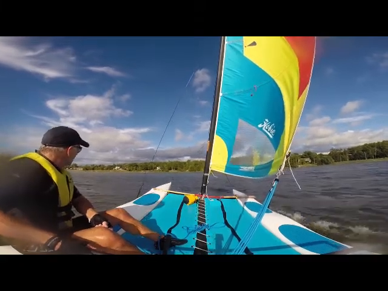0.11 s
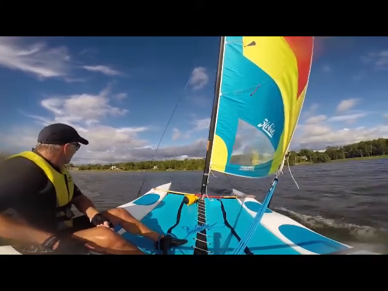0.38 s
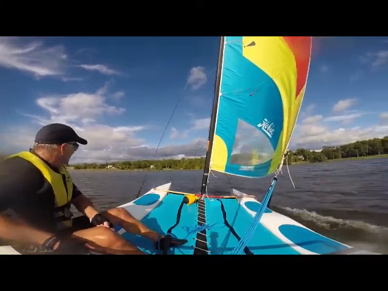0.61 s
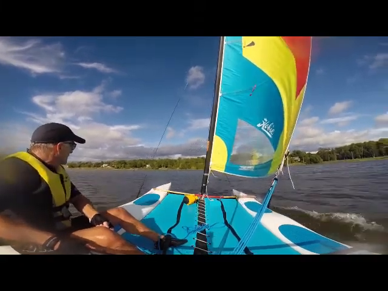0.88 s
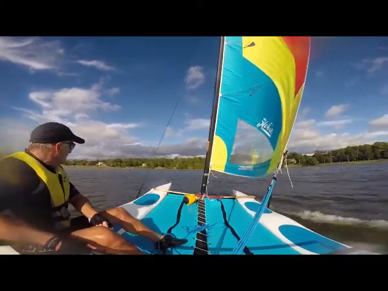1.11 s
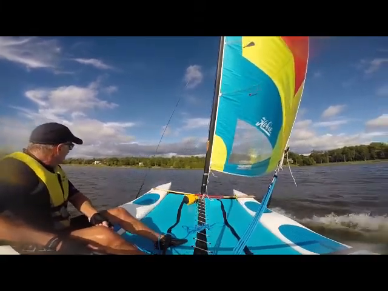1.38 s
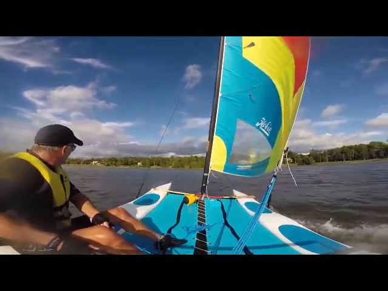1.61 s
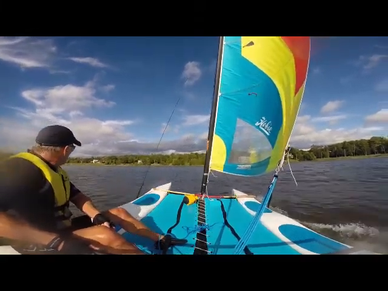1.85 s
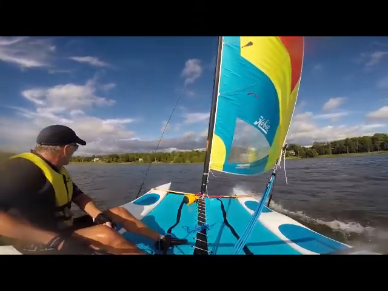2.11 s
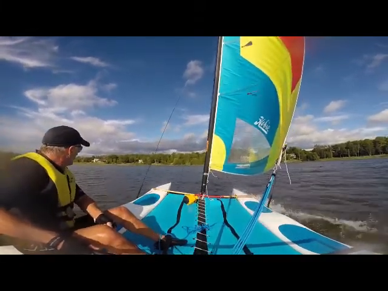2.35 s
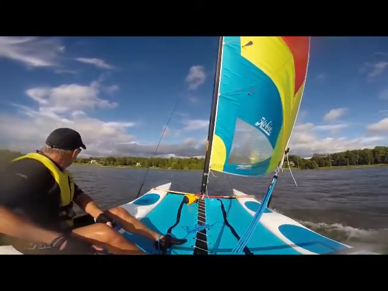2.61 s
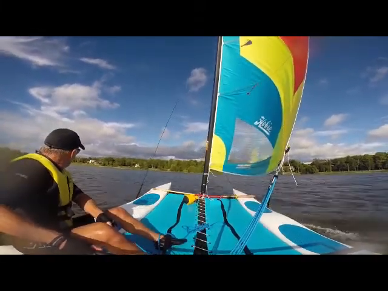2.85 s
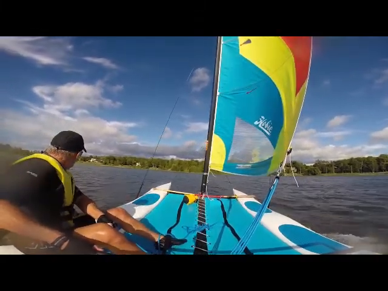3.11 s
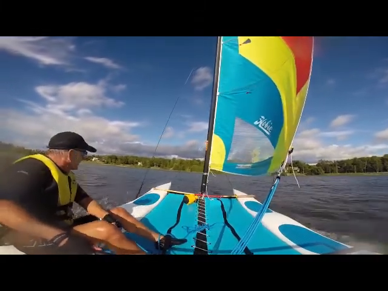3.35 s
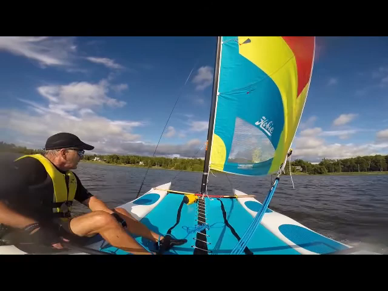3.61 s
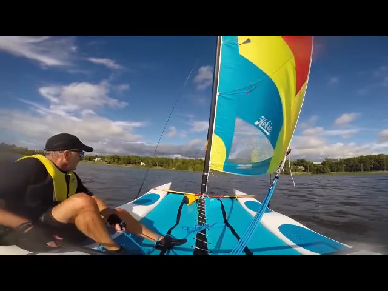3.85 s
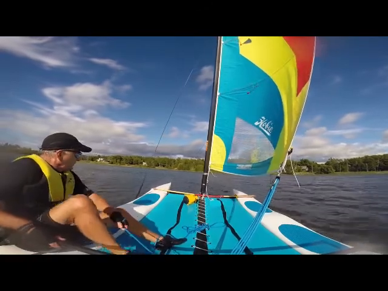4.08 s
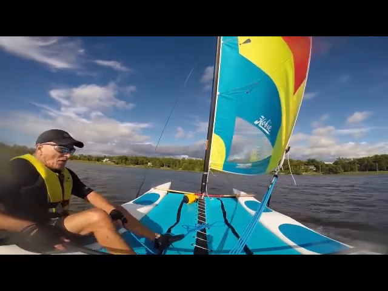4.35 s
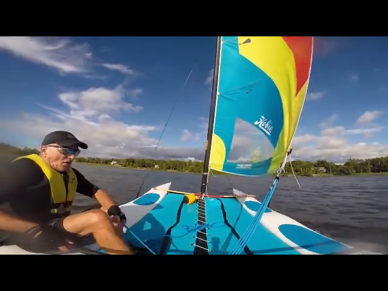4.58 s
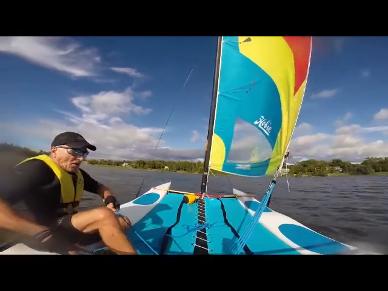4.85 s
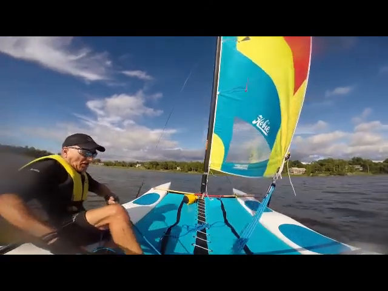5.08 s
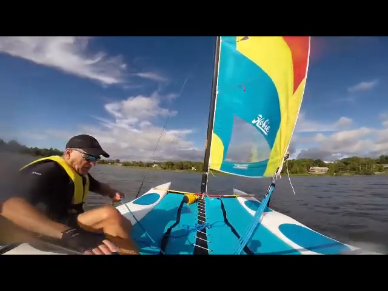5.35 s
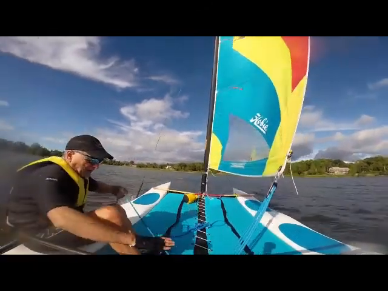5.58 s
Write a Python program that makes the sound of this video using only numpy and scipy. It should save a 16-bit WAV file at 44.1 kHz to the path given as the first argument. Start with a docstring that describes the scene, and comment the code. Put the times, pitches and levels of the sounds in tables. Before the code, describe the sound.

Low muffled rumble and thin spray hiss on a moving sailing catamaran, wavering rudder hum, then a flurry of hollow hull knocks and splashy thumps.

```python
"""A low rumble, hissing spray and a faint rudder hum sound from the start, heard by a small camera in a sealed
housing on a sailing catamaran. Water shakes the frame and boat (noise through resonances), spray hisses through
the housing, the rudders hum as wavering tones and the electronics whine faintly. Waves and a moving sailor knock
the hull: short rough pushes that ring its resonances. Short clicks, most of them from fittings, are brief rings
with cracks; drops drip on rising notes. The level dips briefly after 2.0 s and drops suddenly at 3.7 s."""
import sys
import numpy as np
from scipy import signal
from scipy.fft import rfft, irfft, next_fast_len
from scipy.io import wavfile
from scipy.ndimage import uniform_filter1d, map_coordinates

SR = 44100
rng = np.random.default_rng(int(sys.argv[2]) if len(sys.argv) > 2 else 0)


def magnitude_from_level(level_db):
    """Linear magnitude for a level in decibels (20 dB per decade)."""
    exponent = np.asarray(level_db, float) / 20
    return 10 ** exponent


def pcm_store(signal):
    """Save signal as 16-bit PCM."""
    levels = np.round(np.clip(np.atleast_2d(signal), -1, 1) * 32767)
    wavfile.write(sys.argv[1], SR, levels.astype(np.int16).T)


N = 251811  # length in samples


def unit(x):
    """Scaled to rms 1."""
    return x / np.sqrt(np.mean(x ** 2) + 1e-20)


def curves(rows):
    """One value per sample for each column after the time, by straight lines between rows."""
    start_s, *columns = np.transpose(rows)
    return [np.interp(np.arange(N) / SR, start_s, column) for column in columns]


def wobble(rate):
    """A smooth random curve through rate random points a second."""
    points = rng.standard_normal(int(N * rate / SR) + 4)
    return map_coordinates(points, [np.arange(N) * rate / SR])


def filtered(x, response):
    """x shaped by a response: a function of frequency in Hz."""
    size = next_fast_len(N + SR // 2)  # room for the ringing to die away
    return irfft(rfft(x, size) * response(np.fft.rfftfreq(size, 1 / SR)), size)[:N]


def modes(table):
    """Response of a set of resonances, each ringing on after it is pushed; neighbours have opposite sign."""
    def response(f):
        total = 0
        for k, (centre, width, db) in enumerate(table):
            peak = 1j * f * width / (centre * centre - f * f + 1j * f * width)
            total = total + (-1) ** k * magnitude_from_level(db) * peak
        return total
    return response


def steep(table, top_hz):
    """Resonances whose treble falls away fast above top_hz."""
    return lambda f: modes(table)(f) / (1 + 1j * f / top_hz) ** 2


# resonances of the hull's skin: pitch_hz, width_hz, level_db
SKIN_MODES = [(365.4, 33.3, 4), (458.8, 61.7, 2), (564.7, 49.5, -3.5), (742.5, 43, -15)]


def shell(f):
    """The hull's stiff skin rings in its modes and hardly moves below them."""
    return modes(SKIN_MODES)(f) * (1j * f / 320 / (1 + 1j * f / 320)) ** 3


def waver(turn, rate, steady):
    """A tone of phase turn (radians), partly steady and partly scattered rate times a second."""
    return unit((steady + wobble(rate)) * np.cos(turn) + wobble(rate) * np.sin(turn))


def patchy(depth_db, size):
    """Noise whose gain varies in patches of time and frequency."""
    noise = signal.stft(rng.standard_normal(N + 512), nperseg=256)[2]
    field = uniform_filter1d(rng.standard_normal(noise.shape), size, 0)
    field = uniform_filter1d(field, 3 * size, 1)
    return unit(signal.istft(noise * magnitude_from_level(depth_db * unit(field)), nperseg=256)[1][:N])


def drops(per_s, spread_db):
    """Scattered small impacts of uneven size."""
    hit = rng.random(N) < per_s / SR
    return unit(hit * rng.standard_normal(N) * magnitude_from_level(spread_db * rng.standard_normal(N)))


# steady tones of the camera electronics: pitch_hz, peak_db
WHINE_TONES = [(8780, -76), (11719, -80.5)]


def whine():
    """Camera electronics sing thin, steady, high sine tones."""
    t = np.arange(N) / SR
    return sum(magnitude_from_level(db) * np.sin(2 * np.pi * hz * t) for hz, db in WHINE_TONES)


# levels heard from the water sounds: start_s, sway_db (the frame), churn_db (over calm running), spray_db;
# the spray dips briefly just after 2.0 s, and all three drop suddenly at 3.7 s
HEARD_LEVELS = [(0.0, -19.5, 0.5, -45), (0.43, -27.5, 0.5, -44), (1.0, -22.5, 1.5, -46.5),
                (1.5, -25.5, 1, -45.5), (1.985, -21.5, 4, -45.5), (2.02, -12.5, 4, -49.5),
                (2.14, -20, -1, -48), (2.3, -22.5, -1.5, -45.5), (2.75, -25, 5.5, -44),
                (3.16, -23.5, 6, -44), (3.4, -25.5, 5.5, -47.5), (3.58, -28, 9, -47),
                (3.68, -10.5, 20.5, -39.5), (3.72, -20.5, 7, -44.5), (3.98, -18, 2, -44),
                (4.04, -10, 10, -40.5), (4.17, -10, 17, -39.5), (4.21, -13, 13, -42.5),
                (4.28, -17, 16.5, -41.5), (4.4, -17.5, 3.5, -43.5), (4.52, -26, -0.5, -45),
                (5.595, -31.5, 1, -42.5), (5.625, -18, 9, -41), (5.71, -17.5, -3, -45)]
# resonances, each with pitch_hz, width_hz, level_db: the swaying frame, boom, thud, bright clack, camera housing
SWAY_MODES = [(23.6, 9.9, -2), (49.2, 5.2, 0), (75.1, 12.6, -6.5)]
BOOM_MODES = [(115.4, 15.9, 3.3), (143.5, 27.4, 1.44)]
THUD_MODES = [(209, 26.5, 5), (283, 82, -4.5)]
CLACK_MODES = [(950, 98, 4.5), (1178, 148, 3), (1704, 114, 4), (2525, 270, -8.5), (3450, 220, -7)]
HOUSING_MODES = [(1910, 140, 1.2), (2680, 224, 3.4), (3480, 80, 1.1), (4580, 170, 4.1), (6040, 470, 1.3)]
# tone colour of the spray before the housing: pitch_hz, level_db (relative, per Hz)
SPRAY_COLOUR = [(380, -19), (650, 2), (1400, -4.5), (2640, -7), (3140, -9.5), (3500, -7.5), (4990, -15.5),
                (6060, -11.5), (8120, -19.5), (10900, -21.5), (12000, -32), (15600, -71), (22000, -120)]
# boom, slosh, wash: level in calm running (dB)
CALM_LEVELS_DB = [-40, -43, -57.5]
# boom, slosh, wash: growth for each dB of churn (dB)
CHURN_GROWTH = [1, 1.11, 1.09]
# sway, boom, slosh, wash, spray: size of the random swells (dB)
SWELL_DB = [1.37, 0.93, 0.69, 2.4, 0.47]


def water():
    """Turbulence drives each part of the boat; spray reaches the microphone through the housing."""
    sway_db, churn_db, spray_db = curves(HEARD_LEVELS)
    boom_db, slosh_db, wash_db = (calm + grows * churn_db for calm, grows in zip(CALM_LEVELS_DB, CHURN_GROWTH))
    swells = [magnitude_from_level(db * wobble(6)) for db in SWELL_DB]

    # the frame keeps swinging in its main mode
    swing = waver(2 * np.pi * SWAY_MODES[1][0] * np.arange(N) / SR, rate=6.9, steady=2.55)
    shaking = unit(filtered(rng.standard_normal(N), steep(SWAY_MODES, 160)))
    sway = unit(shaking + 0.59 * swing)

    boom = unit(filtered(rng.standard_normal(N), steep(BOOM_MODES, 320))) * magnitude_from_level(1.06 * wobble(12))

    gurgle = magnitude_from_level(2.13 * wobble(25))  # slosh and wash surge together
    slaps = patchy(2.5, size=2) * gurgle + 0.5 * drops(per_s=150, spread_db=3)
    slosh = unit(filtered(slaps, lambda f: shell(f) + 0.44 * modes(THUD_MODES)(f)))

    splashes = patchy(2.5, size=2) * gurgle + 0.56 * drops(per_s=400, spread_db=3)
    broad = modes([(800, 500, 0)])
    wash = unit(filtered(splashes, lambda f: steep(CLACK_MODES, 2200)(f) + 0.2 * broad(f)))

    colour_hz, colour_db = np.transpose(SPRAY_COLOUR)

    def through_housing(f):
        colour = magnitude_from_level(np.interp(np.log(f + 1), np.log(colour_hz), colour_db))
        return colour * (0.68 + 0.61 * abs(modes(HOUSING_MODES)(f)))

    fizz = 0.4 * drops(per_s=900, spread_db=3)
    hiss = patchy(1.07, size=5) * magnitude_from_level(1.34 * wobble(26))
    spray = unit(filtered(hiss + fizz, through_housing))

    levels_db = sway_db, boom_db, slosh_db, wash_db, spray_db
    parts = sway, boom, slosh, wash, spray
    return sum(magnitude_from_level(db) * swell * part for db, swell, part in zip(levels_db, swells, parts))


# the two rudders: start_s, pitch_hz (lower tone), low_db (lower tone), high_db (higher tone)
RUDDER_TONES = [(0, 207, -33.5, -41), (.4, 199.4, -37.5, -57), (.65, 201, -34.5, -50),
                (1.0, 203.4, -32, -38.5), (1.12, 202.8, -25, -35), (1.45, 205.6, -23.5, -34),
                (1.8, 213.7, -25, -36), (2.0, 210.3, -40, -39), (2.26, 216.3, -39, -41),
                (2.52, 215.7, -25, -29.5), (2.7, 213.6, -39, -35), (3, 210, -38.5, -38.5),
                (3.2, 209.1, -26, -31.5), (3.5, 206.5, -35, -38), (4.25, 196.7, -29, -42),
                (4.52, 192.5, -35, -37.5), (4.72, 185.7, -25.5, -50), (4.94, 183.3, -44, -56),
                (5.71, 185.2, -49, -54)]


def rudder():
    """Vortices off each blade sing a wavering tone with a weak octave; the two beat."""
    low_hz, low_db, high_db = curves(RUDDER_TONES)
    turn = 2 * np.pi * np.cumsum(low_hz) / SR

    def sing(phase):
        octave = waver(2 * phase, rate=30, steady=0.22)
        return waver(phase, rate=19, steady=0.88) + magnitude_from_level(-21.5) * octave

    return magnitude_from_level(low_db) * sing(turn) + magnitude_from_level(high_db) * sing(1.13 * turn)


# drips: loudest_s (time of the swell's top), peak_db, pitch_hz (at the start)
DRIP_NOTES = [(1.718, -37, 2540), (4.0775, -30, 2480), (5.2844, -33, 2896)]


def drips():
    """A drop rings softly on one rising note."""
    out, t = np.zeros(N + 1500), np.arange(1500) / SR
    ring_s = 0.0024  # time to the top of the swell
    for s, db, hz in DRIP_NOTES:
        note = np.sin(2 * np.pi * hz * t * (1 + 8.2 * t))  # the squared time makes the pitch rise
        swell = t / ring_s * np.exp(1 - t / ring_s)
        out[round((s - ring_s) * SR):][:1500] += magnitude_from_level(db) * note * swell
    return out[:N]


# short clicks: start_s, level_db (before the final tone shaping), pitch_hz (of the ring);
# most are fittings, the one at 3.702 s is a click at a sudden drop in level
CLICK_HITS = [(0.224, -24, 4080), (0.234, -22, 4500), (0.2476, -17, 4360), (0.254, -19, 3480),
              (0.2628, -24, 3100), (0.2707, -16, 2700), (0.2947, -11.5, 4580), (0.3544, -22, 4660),
              (0.3648, -16, 2730), (0.379, -14, 2330), (0.3971, -7, 3200), (0.6619, -22, 5900),
              (1.995, -21, 3441), (3.048, -17.5, 6130), (3.229, -19.5, 3596), (3.251, -14, 2870),
              (3.6181, -17, 2550), (3.702, -20, 5000), (3.7775, -12, 2640), (3.8387, -17, 2522),
              (4.1673, -18, 5530), (4.7242, -21, 2740)]


def clicks():
    """Short clicks, most from hard fittings: a brief ring with a broad crack, coloured by the housing."""
    out, t = np.zeros(N + 400), np.arange(400) / SR
    attack = 1 - np.exp(-t / 0.000088)
    for s, db, hz in CLICK_HITS:
        ring = np.sin(2 * np.pi * hz * t) * np.exp(-t / 0.00042)
        crack = magnitude_from_level(-8.5) * rng.standard_normal(400) * np.exp(-t / 0.0026)
        out[round(s * SR):][:400] += magnitude_from_level(db) * (ring + crack) * attack

    def tone(f):
        no_bass = (1j * f / 1500 / (1 + 1j * f / 1500)) ** 2
        soft_treble = 1 / (1 + 1j * f / 5000) ** 2
        return no_bass * soft_treble * (0.7 + 0.43 * abs(modes(HOUSING_MODES)(f)))

    return filtered(out[:N], tone)


# jolts that kick the whole frame: start_s, peak_db
JOLT_KICKS = [(1.994, -7), (4.08, -5), (5.606, -13.5)]


def jolts():
    """Blows kick the frame: a swing or two in its third mode, soon damped."""
    out, t = np.zeros(N + SR), np.arange(SR // 5) / SR
    rise_s, fade_s = 0.0024, 0.016
    swing = np.cos(2 * np.pi * SWAY_MODES[2][0] * t) * (1 - np.exp(-t / rise_s)) * np.exp(-t / fade_s)
    for s, db in JOLT_KICKS:
        out[round(s * SR):][:len(t)] += magnitude_from_level(db) * swing / abs(swing).max()
    return out[:N]


def blows(times, levels_db, responses, contact_s, rise_s):
    """Each knock is a short rough contact that rings a set of resonances, with a peak at the given level."""
    out, t = np.zeros(N + SR), np.arange(SR // 3) / SR
    hz = np.fft.rfftfreq(len(t), 1 / SR)
    for s, db, response in zip(times, levels_db, responses):
        push = rng.standard_normal(len(t)) * np.exp(-t / contact_s) * (1 - np.exp(-t / rise_s))
        ring = irfft(rfft(push) * response(hz), len(t))
        start = round((s - 0.0015) * SR)  # contact begins just before it is heard
        out[start:][:len(t)] += magnitude_from_level(db) * ring / abs(ring).max()
    return out[:N]


# knocks: start_s, peak_db (of the skin's ring), skin_hz (favoured pitch),
# boom_db and clack_db (peaks of these layers against peak_db)
KNOCK_HITS = [(0.14, -26.5, 594, -24, -7.5), (1.519, -10, 434, -30, -33), (1.931, -17.5, 460, 3, -12),
              (1.992, -5.5, 438, -5.5, -14.5), (2.002, -9, 680, -2.5, -18), (2.022, -27, 525, 11.5, -24),
              (2.093, -21, 385, 3.5, -17), (2.13, -27.5, 428, 4.5, -15), (2.596, -14.5, 510, -11, -25),
              (2.615, -18.5, 480, -21, -20), (2.933, -26.5, 371, 7.5, -16), (3.004, -26, 544, 6.5, -24),
              (3.046, -7, 450, 2, -14.5), (3.131, -12, 563, 9, -9.5), (3.154, -12, 331, 7.5, -9),
              (3.221, -12, 331, -8, -13.5), (3.228, -18, 424, 11, -9), (3.254, -20.5, 540, 19, -7),
              (3.303, -23.5, 552, 10.5, -9), (3.418, -20, 412, -3, -13.5), (3.483, -16.5, 388, 0.5, -11.5),
              (3.512, -20.5, 417, -6, -11.5), (3.554, -25.5, 417, -12, -25), (3.593, -21.5, 495, 1, -24),
              (3.624, -14, 536, 7.5, -10.5), (3.648, -13, 406, 2.5, -13), (3.666, -9, 484, -0.5, -11),
              (3.688, -17.5, 480, -2, -13.5), (3.779, -22, 382, -19, -5.5), (3.836, -26.5, 380, -7, -8.5),
              (3.901, -7.5, 413, .5, -12), (3.927, -20, 374, 1.5, -12.5), (4.02, -6.5, 418, -6.5, -13),
              (4.05, -4.5, 397, -5.5, -13), (4.078, -19, 514, 0, -4.5), (4.112, -9, 570, 0.5, -13.5),
              (4.144, -16.5, 393, -4.5, -3.5), (4.221, -6.5, 375, 3, -18), (4.263, -14.5, 421, 5, -8.5),
              (4.325, -17.5, 530, 7, -7.5), (4.352, -13, 517, 1, -21), (4.393, -20.5, 433, 4.5, -25),
              (5.539, -25, 379, -9, -18), (5.606, -17.5, 381, -5, -17), (5.666, -25, 417, -13, -38)]


def knocks():
    """The skin answers at once, the boom swells a moment later, thuds set the frame swaying, clacks rattle."""
    s, db, skin_hz, boom_db, clack_db = np.transpose(KNOCK_HITS)
    draws = rng.standard_normal((len(KNOCK_HITS), len(CLACK_MODES) + 1))
    thud_db = -21 + 0.45 * db + 4 * draws[:, -1]  # grows with the knock, varies from blow to blow

    def every(response):
        return [response] * len(KNOCK_HITS)

    # the place struck favours some skin modes
    spot = [lambda f, hz=hz: shell(f) * (0.3 + modes([(hz, 220, 0)])(f)) for hz in skin_hz]
    # each blow shifts the clack levels by its own random dB
    rattle = [steep(CLACK_MODES + np.outer(draw[:-1], [0, 0, 4.5]), 3200) for draw in draws]

    def thud_response(f):
        return modes(THUD_MODES)(f) + 4.1 * modes(SWAY_MODES)(f)

    skin = blows(s, db, spot, contact_s=0.0039, rise_s=0.000093)
    boom = blows(s, db + boom_db, every(steep(BOOM_MODES, 400)), contact_s=0.0051, rise_s=0.0075)
    thud = blows(s, thud_db, every(thud_response), contact_s=0.0047, rise_s=0.00082)
    clack = blows(s, db + clack_db, rattle, contact_s=0.012, rise_s=0.0011)
    return skin + boom + thud + clack


def scene():
    """All the sources add up at one microphone."""
    return (whine() + water() + rudder() + drips() + clicks() + jolts() + knocks())[None]


def low_pass(x):
    """Removes everything above the highest recorded frequency."""
    return signal.sosfilt(signal.butter(12, 12170, fs=SR, output="sos"), x)


def record(dry):
    """The loudest peaks round off just below full scale; a filter removes everything from 12 kHz up."""
    soft = dry / (1 + abs(dry / 0.97) ** 6) ** (1 / 6)
    mix = filtered(soft[0], lambda f: f < 12000)[None]
    return low_pass(mix)


dry = scene()
out = record(dry)
pcm_store(out)
```